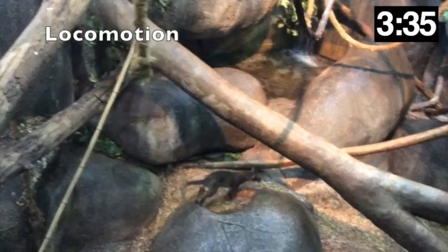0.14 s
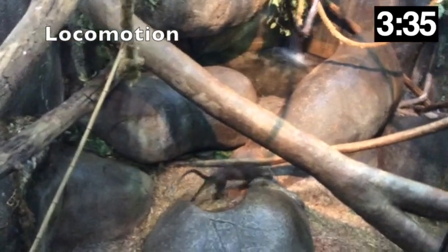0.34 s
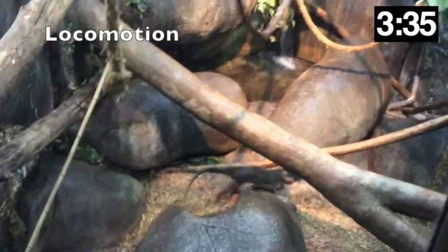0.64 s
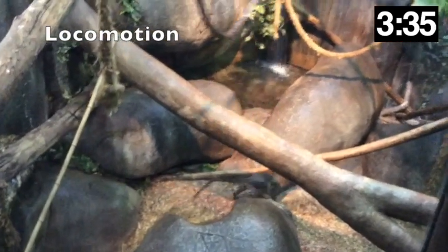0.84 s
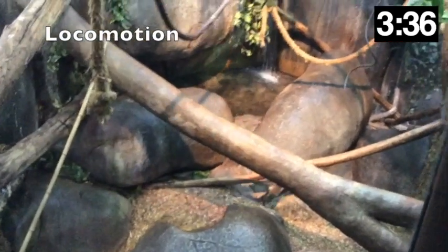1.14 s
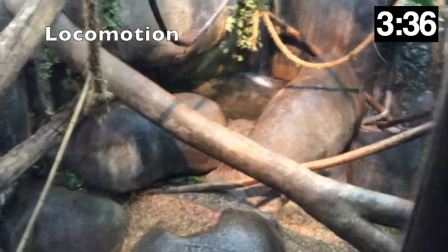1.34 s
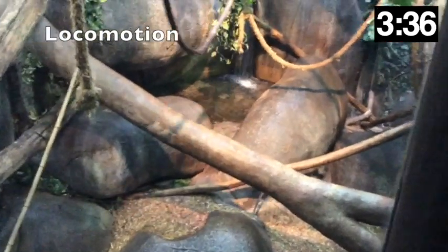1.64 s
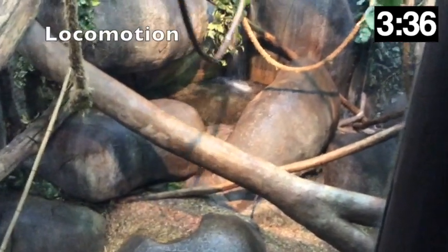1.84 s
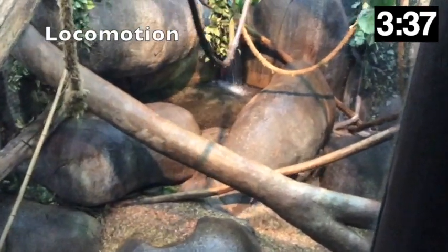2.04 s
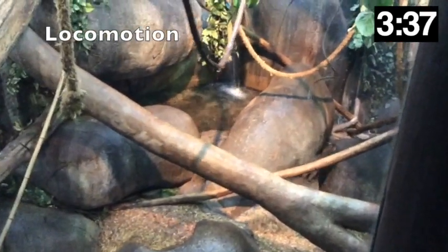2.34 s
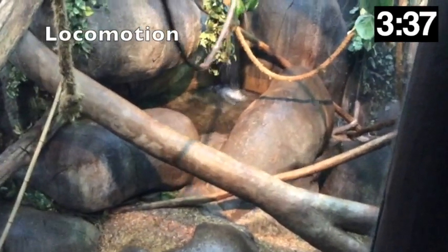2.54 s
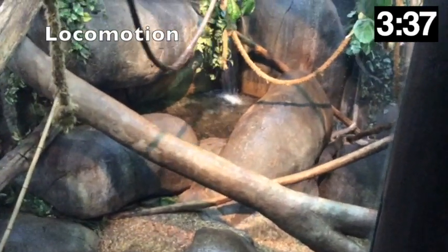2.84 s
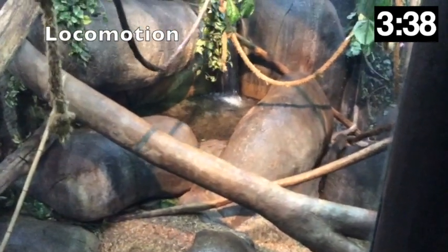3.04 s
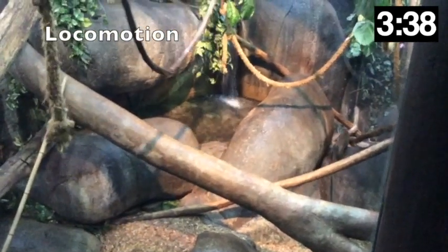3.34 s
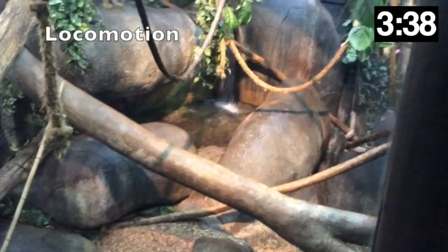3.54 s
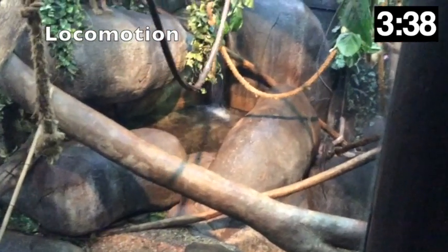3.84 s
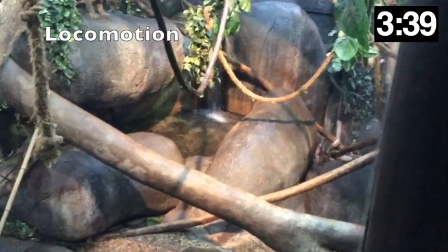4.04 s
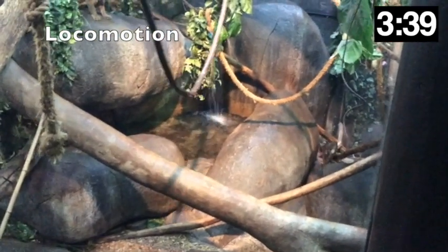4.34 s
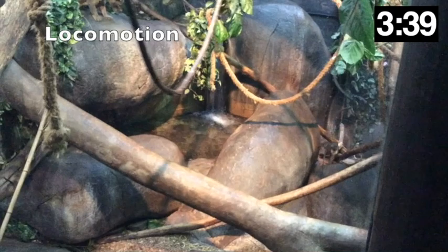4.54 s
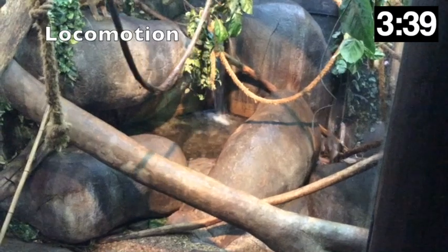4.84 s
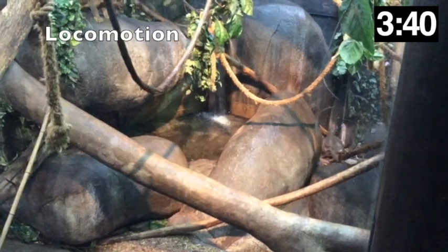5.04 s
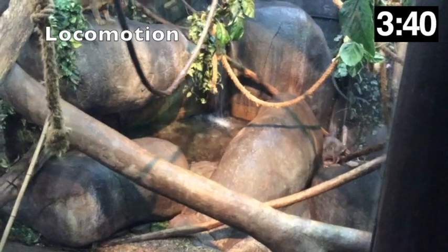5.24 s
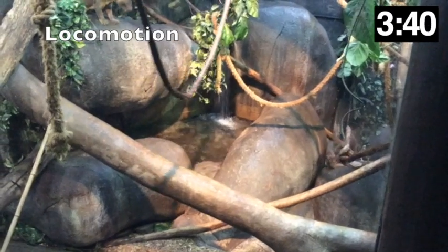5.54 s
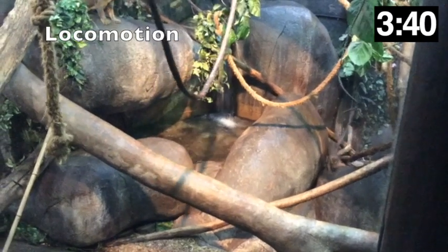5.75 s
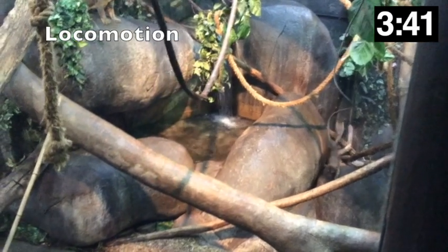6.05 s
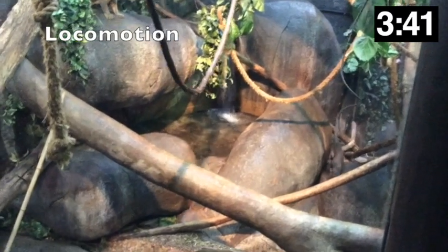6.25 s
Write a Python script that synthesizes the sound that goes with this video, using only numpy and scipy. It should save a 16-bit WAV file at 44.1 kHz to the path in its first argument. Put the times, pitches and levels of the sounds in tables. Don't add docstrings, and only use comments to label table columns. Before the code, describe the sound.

A small monkey gives four long, thin rising whistles, then faint quick chirps, over rushing water, pump whine and crickets in an echoing enclosure.

```python
import sys
import numpy as np
from scipy import signal
from scipy.fft import irfft, next_fast_len
from scipy.io import wavfile
from scipy.ndimage import uniform_filter1d

SR = 44100
rng = np.random.default_rng(int(sys.argv[2]) if len(sys.argv) > 2 else 0)


def linear_from_db(decibels):
    return 10 ** (np.asarray(decibels, float) / 20)


def inscribe(sig):
    pcm = np.round(np.clip(np.atleast_2d(sig).T, -1, 1) * 32767)
    wavfile.write(sys.argv[1], SR, pcm.astype(np.int16))


N = 281313

# (frequency [Hz], level [dB per Hz])
WATER_COLOUR = [(20, -40), (45, -6), (90, 0), (250, -5), (500, -13), (1000, -15), (2000, -17), (3300, -20),
                (5000, -17), (6600, -15), (7100, -19), (10000, -24), (13300, -32.5), (15300, -35)]
# (from [s], to [s], level before [dB], level after [dB])
TOP_FADE = (2.5, 4.5, 6.5, -1)
# (time [s], boost [dB], rise [s], fall [s])
FLOOR_BOOM = (1.514, 5.7, 0.099, 0.077)
# (time [s], length [s], frequency [Hz], width [Hz], level [dB])
POOL_GURGLES = [
    (.49, 0.079, 690, 50, -59),
    (1.82, 0.056, 770, 80, -61),
    (3.42, 0.16, 450, 40.6, -67),
    (3.62, 0.192, 816, 140, -60),
    (4.12, 0.28, 510, 128, -59),
]
# (frequency [Hz], width [Hz], level [dB])
MACHINE_WHINES = [(94, 15, -79), (202, 14, -67.5), (417, 12, -75), (1038, 43, -67), (1643, 79, -68.5),
                  (2019, 16, -67), (2172, 216, -58), (3710, 120, -67), (3890, 88, -61.5), (4080, 168, -57),
                  (4330, 100, -59.5), (4800, 480, -61.5), (5080, 150, -60.5), (5480, 130, -64.5),
                  (5636, 30, -63.5), (5840, 170, -61.5), (6324, 420, -51.5), (7040, 110, -75.5)]
# (time [s], length [s], frequency [Hz], width [Hz], level [dB])
PUMP_HUMS = [
    (.55, 1.47, 415, 9.4, -64.5),
    (2.5, 2.35, 415, 11, -64),
    (5.1, .4, 412, 7, -72),
]
# (time [s], length [s], frequency [Hz], width [Hz], level [dB])
CRICKET_SONGS = [(.05, 0.78, 5200, 35.4, -57.5), (.1, 0.7, 4770, 35, -63), (.1, 0.6, 5270, 30, -68),
                 (1.33, 0.36, 4880, 61, -56.5), (1.55, .5, 5200, 50, -66), (1.6, 0.77, 5030, 46, -62),
                 (1.95, .5, 4740, 30, -62), (2.2, 1.1, 5380, 30, -62), (2.45, .3, 4970, 45, -65),
                 (2.4, 0.68, 5636, 24.9, -63), (2.55, 0.76, 4330, 60, -55.5),
                 (3.63, 0.31, 4810, 44.7, -55.5), (3.95, 0.81, 5190, 60, -59), (4.1, 2, 4650, 25.2, -63.5),
                 (4.2, 1.55, 4330, 59.4, -58), (4.7, 1.14, 5636, 24.9, -58), (5.05, 0.77, 4980, 60.6, -56),
                 (5.1, 0.47, 5370, 35, -58), (6.12, 0.25, 4890, 45, -56.5)]
# (time [s], length [s], frequency [Hz], width [Hz], level [dB])
LOW_CRICKET_SONGS = [(0.29, .2, 3650, 240, -59.5), (.88, 0.19, 3650, 250, -59), (3.38, 0.44, 3700, 71, -60),
                     (5.4, 0.39, 3700, 80, -58), (0.29, 0.86, 4220, 110, -60), (.15, .9, 3950, 120, -60.5),
                     (1.22, 1.16, 4060, 150, -57), (2.46, 1.93, 4030, 140, -56), (3.98, 2.8, 4100, 134, -54.5)]
# (time [s], frequency [Hz], level [dB], time to fall 60 dB [s])
PAW_THUDS = [
    (1.465, 253, -38, 0.11),
]
# (time [s], centre [Hz], width [Hz], level [dB])
LIP_TICKS = [
    (4.947, 8840, 2990, -41),
    (5.146, 9500, 2500, -37),
    (5.348, 8500, 4000, -35),
    (5.549, 8500, 5000, -41),
    (5.745, 9000, 5000, -49),
    (5.92, 8000, 5000, -70),
]
# (time [s], pitch [Hz], level [dB])
LONG_CALLS = [
    [(0.084, 6090, -46), (0.25, 6167, -45.5), (0.45, 6393, -35), (0.694, 6653, -31), (0.82, 6655, -29.5),
     (1.178, 6933, -29)],
    [(1.575, 6250, -46), (1.672, 6190, -34.5), (1.69, 6356, -35.5), (2.008, 6774, -28.5),
     (2.29, 7030, -28.5), (2.331, 7065, -32.5)],
    [(2.709, 6165, -45.5), (2.946, 6524, -32.5), (3.183, 6718, -27.5), (3.299, 6850, -35),
     (3.331, 7120, -30), (3.365, 7357, -26.5), (3.42, 7320, -27.5)],
    [(3.995, 6530, -45), (4.272, 6490, -39), (4.285, 6563, -34.5), (4.537, 6746, -35.5), (4.7, 6910, -35.5),
     (4.749, 6925, -37)],
]
# (length [s], fall [Hz], second partial against first [dB])
CALL_ENDINGS = [
    (0.039, 940, -27.5),
    (0.048, 1000, -25.5),
    (0.045, 860, -28.5),
    (0.036, 800, -30.5),
]
# (time [s], start pitch [Hz], top pitch [Hz], levelling: small early, large late, level [dB])
SHORT_CHIRPS = [
    (5.093, 7440, 8580, 0.395, -46),
    (5.293, 5150, 6950, 1.57, -50.5),
    (5.506, 5140, 7150, 1.2, -49),
    (5.688, 5100, 7350, 1.5, -47),
    (5.872, 5230, 7230, 1.32, -48),
    (6.05, 5250, 5850, .8, -54),
]
# (frequency [Hz], width [Hz], level [dB])
MOUTH_RESONANCE = (11600, 810, -8.5)
# (level over the tail [dB], time to fall 60 dB [s])
NEAR_ROCKS = (2.1, 0.34)
# (whistle level [dB], added to mask [dB])
MASK_BY_LOUDNESS = [
    (-50, -1),
    (-45, 2),
    (-38, 6),
    (-33, -1.5),
    (-28, -7.5),
]


def level(x, db):
    return x * linear_from_db(db) / np.sqrt(np.mean(x ** 2))


def coloured(gain):
    size = next_fast_len(N)
    real, imaginary = rng.standard_normal((2, size // 2 + 1))
    hz = np.arange(size // 2 + 1) * SR / size + 1e-9
    return irfft((real + 1j * imaginary) * gain(hz), size)[:N]


def narrow_band(hz, width_hz, db):
    return level(coloured(lambda f: 1 / (1 + (2 * (f - hz) / width_hz) ** 2)), db)


def walk(rate):
    hold = int(SR / rate)
    steps = np.repeat(rng.standard_normal(N // hold + 1), hold)
    return 2.16 * uniform_filter1d(uniform_filter1d(steps, hold), hold)[:N]


def swells(rows):
    out, t = 0, np.arange(N) / SR
    for start, length, hz, width_hz, db in rows:
        nearest_end = np.minimum(t - start, start + length - t)
        out = out + narrow_band(hz, width_hz, db) * np.clip(nearest_end / (0.13 * length), 0, 1)
    return out


def waterfall():
    t = np.arange(N) / SR
    hz, db = np.transpose(WATER_COLOUR)
    rush = level(coloured(lambda f: linear_from_db(np.interp(np.log(f), np.log(hz), db))), -49.5)
    below = []
    for split_hz in (700, 7000, 11000):
        lowpass = signal.butter(2, split_hz, fs=SR, output="sos")
        below.append(signal.sosfiltfilt(lowpass, rush))
    rumble, splash, spray, mist = np.diff([0 * rush] + below + [rush], axis=0)
    knock, boom_db, rise, fall = FLOOR_BOOM
    boom_db = boom_db * np.exp(-np.maximum((knock - t) / rise, (t - knock) / fall))
    rumble = rumble * linear_from_db(boom_db + 0.25 * walk(2.94))
    splash = splash * linear_from_db(0.9 * boom_db + 0.5 * walk(7.5))
    mist = mist * linear_from_db(np.interp(t, TOP_FADE[:2], TOP_FADE[2:]))
    return rumble + splash + spray * linear_from_db(3.5) + mist


def machines():
    out = 0
    for hz, width_hz, db in MACHINE_WHINES:
        sway_db, flicker_db = 0.25 * walk(1.772), 0.83 * walk(15)
        out = out + narrow_band(hz, width_hz, db) * linear_from_db(sway_db + flicker_db)
    return out


def low_crickets():
    throb_hz, throb_db = 19, 4
    phase = 2 * np.pi * np.cumsum(throb_hz * (1 + 0.039 * walk(3))) / SR
    return swells(LOW_CRICKET_SONGS) * linear_from_db(throb_db * np.sin(phase))


def thuds():
    out, t = np.zeros(N), np.arange(SR // 4) / SR
    for start, hz, db, t60 in PAW_THUDS:
        ring = np.sin(2 * np.pi * hz * t) * 1000 ** (-t / t60) * np.clip(t / 0.0035, 0, 1)
        i = int(start * SR)
        out[i:i + len(t)] += linear_from_db(db) * ring
    return out


def ticks():
    out, t = np.zeros(N), np.arange(SR // 50) / SR
    for start, hz, width_hz, db in LIP_TICKS:
        edges = [hz - width_hz / 2, hz + width_hz / 2]
        band = signal.butter(2, edges, "band", fs=SR, output="sos")
        burst = rng.standard_normal(len(t)) * np.exp(-t / 0.0035)
        i = int(start * SR)
        out[i:i + len(t)] += linear_from_db(db) * signal.sosfilt(band, burst)
    return out


def add_whistle(out, times, hz, db, second_db):
    t = np.arange(times[0], times[-1], 1 / SR)
    waver = 1 + 0.00092 * walk(60.18)[:len(t)]
    phase = 2 * np.pi * np.cumsum(np.interp(t, times, hz) * waver) / SR
    soft_edge = np.clip(np.minimum(t - times[0], times[-1] - t) / 0.0021, 0, 1)
    size = np.sqrt(2) * soft_edge * linear_from_db(np.interp(t, times, db))
    i = int(times[0] * SR)
    out[0, i:i + len(t)] += size * np.sin(phase)
    out[1, i:i + len(t)] += size * linear_from_db(np.interp(t, times, second_db)) * np.sin(2 * phase)


def long_calls(out):
    end_fade_db = -14
    for call, (length, fall_hz, second_db) in zip(LONG_CALLS, CALL_ENDINGS):
        end, end_hz, end_db = call[-1]
        bend = (end + 0.29 * length, end_hz - 0.35 * fall_hz, end_db + 0.42 * end_fade_db)
        stop = (end + length, end_hz - fall_hz, end_db + end_fade_db)
        times, hz, db = np.transpose(list(call) + [bend, stop])
        outside_hz = np.clip(np.maximum(6300 - hz, hz - 6940), 0, None)
        add_whistle(out, times, hz, db, second_db - 0.025 * outside_hz)


def chirps(out):
    length_s = 0.054
    u = np.linspace(0, 1, num=24)
    mouth_hz, mouth_width_hz, mouth_db = MOUTH_RESONANCE
    for start, start_hz, top_hz, bend, db in SHORT_CHIRPS:
        rise = (1 - np.exp(-u / bend)) / (1 - np.exp(-1 / bend))
        hz = start_hz + (top_hz - start_hz) * rise
        second_db = mouth_db - 6 * ((2 * hz - mouth_hz) / mouth_width_hz) ** 2
        add_whistle(out, start + length_s * u, hz, db - 5 * (1 - u) ** 2, second_db)


def monkey():
    out = np.zeros((2, N))
    long_calls(out)
    chirps(out)
    return out


def enclosure(x, t60):
    t = np.arange(SR) / SR
    near_db, near_t60 = NEAR_ROCKS
    fading = 1000 ** (-t / t60) + linear_from_db(near_db) * 1000 ** (-t / near_t60)
    echoes = rng.standard_normal(SR) * fading * (t > 0.0044)
    echoes /= np.sqrt(np.sum(echoes ** 2))
    echoes[0] = linear_from_db(-4)
    return signal.fftconvolve(x, echoes)[:N]


def scene():
    background = waterfall() + swells(POOL_GURGLES) + machines() + swells(PUMP_HUMS)
    chorus = swells(CRICKET_SONGS) + low_crickets()
    first, second = monkey()
    calls = enclosure(first, 0.69) + enclosure(second + ticks(), 0.28)
    return (background + chorus + thuds() + calls)[None]


def drop_masked(x):
    frame = dict(fs=SR, window="cosine", nperseg=2048, noverlap=1024)
    _, t, z = signal.stft(x, **frame)
    power = np.sum(np.abs(z[:-1].reshape(64, 16, -1)) ** 2, axis=1) + 1e-18
    db = 10 * np.log10(power)
    held_db = 10 * np.log10(uniform_filter1d(power, size=3))
    khz = np.arange(64) * SR / 128 / 1000
    column_khz = khz[:, None]
    above = column_khz - khz
    upward = 6.5 * np.minimum(above, 2) + 3.3 * np.maximum(above - 2, 0)
    spread = -23 - np.where(above > 0, upward, -13 * above)
    whistles = khz > 5
    mask = np.max((spread[:, :, None] + held_db)[:, whistles], axis=1)
    mask += 1.7 * rng.standard_normal(len(t)) * np.clip((column_khz - 6.5) / 2.5, 0.4, 1.5)
    whistle_db = 10 * np.log10(uniform_filter1d(np.max(power[whistles], axis=0), size=5))
    extra_db = np.interp(whistle_db, *np.transpose(MASK_BY_LOUDNESS))
    extra_db = extra_db + 0.6 * t * (whistle_db > MASK_BY_LOUDNESS[1][0] - 2)
    mask += extra_db
    mask[khz > 13] = np.clip(np.max(held_db[whistles], axis=0) - 39 + extra_db, -79.5, -72)
    mask += np.interp(t, TOP_FADE[:2], [0, -11]) * np.clip((column_khz - 10) / 3, 0, 1)
    mask += 1.8 * rng.standard_normal(db.shape)
    z[:-1] *= np.repeat(db > mask, 16, axis=0)
    return signal.istft(z, **frame)[1][:N]


def roll_off(x):
    return signal.sosfilt(signal.butter(12, 15290, fs=SR, output="sos"), x)


def record(dry):
    mix = drop_masked(dry[0])[None]
    return roll_off(mix)


dry = scene()
out = record(dry)
inscribe(out)
```